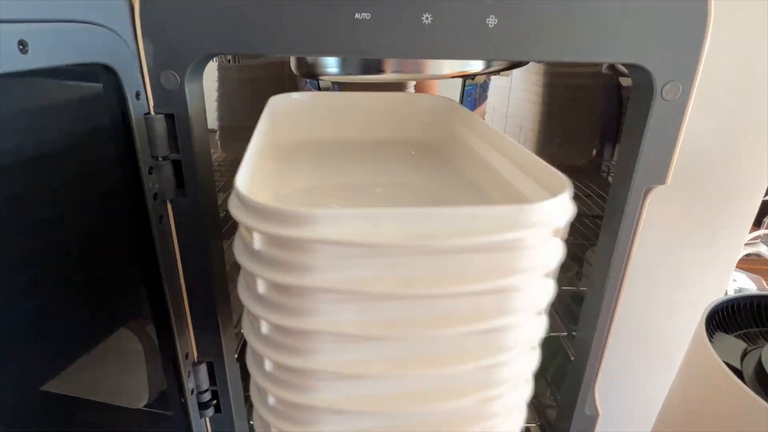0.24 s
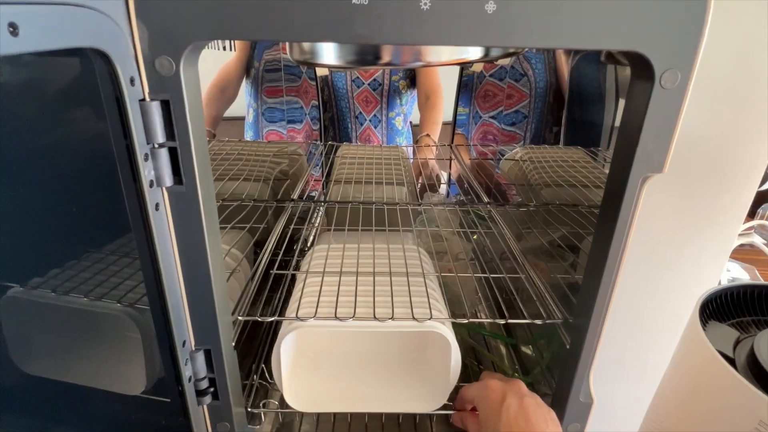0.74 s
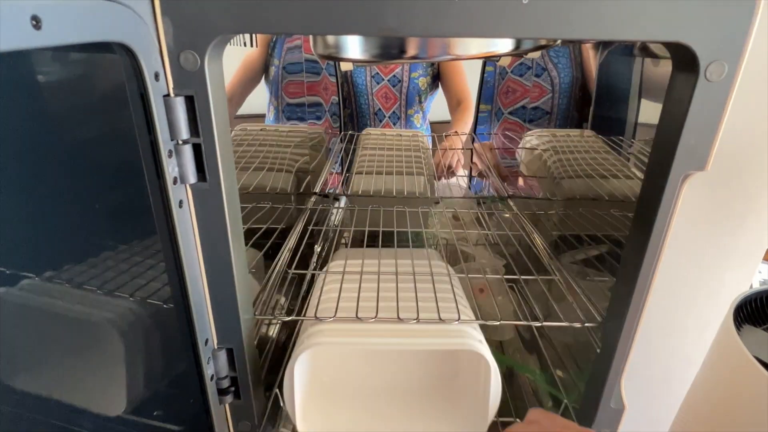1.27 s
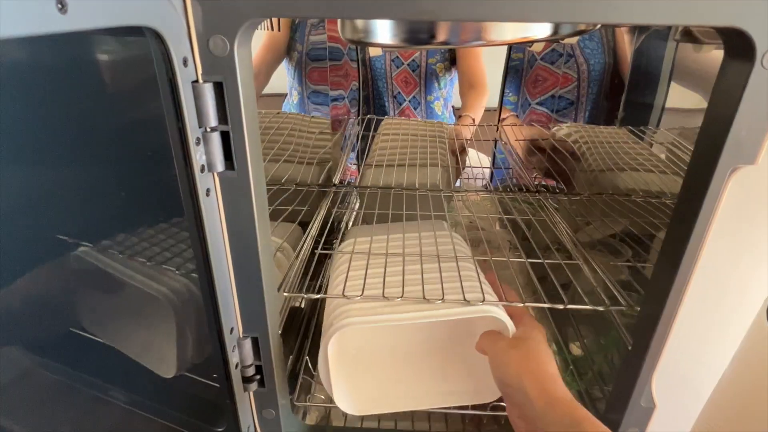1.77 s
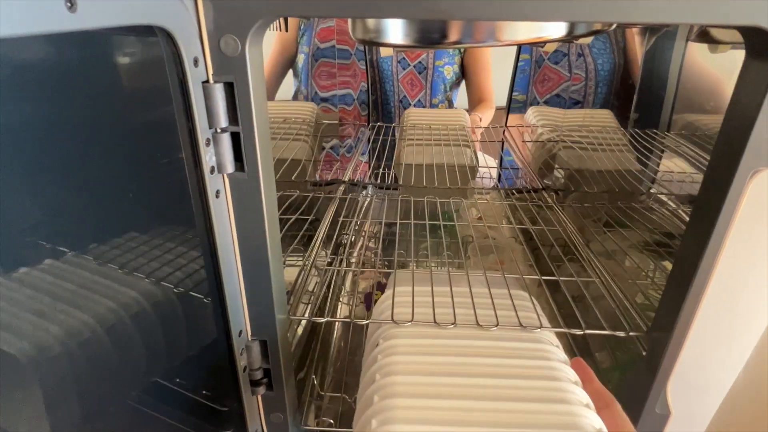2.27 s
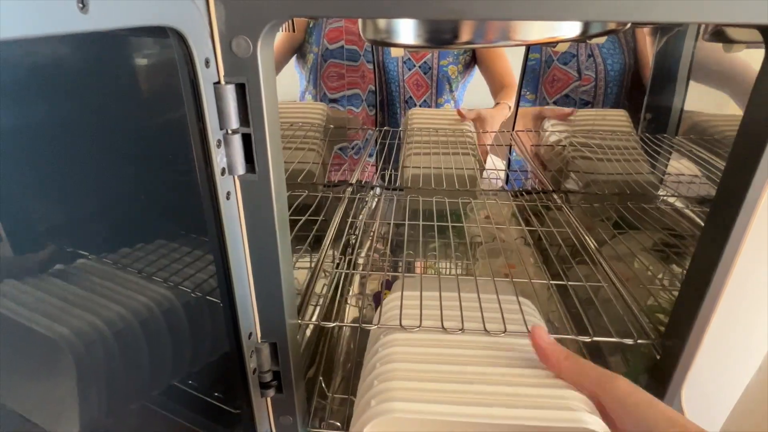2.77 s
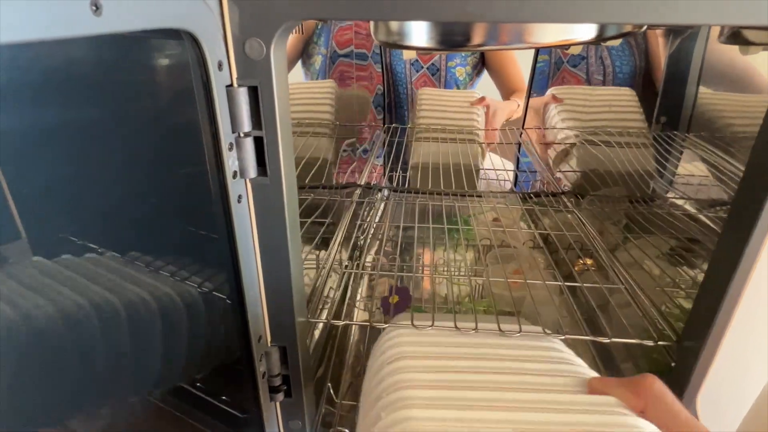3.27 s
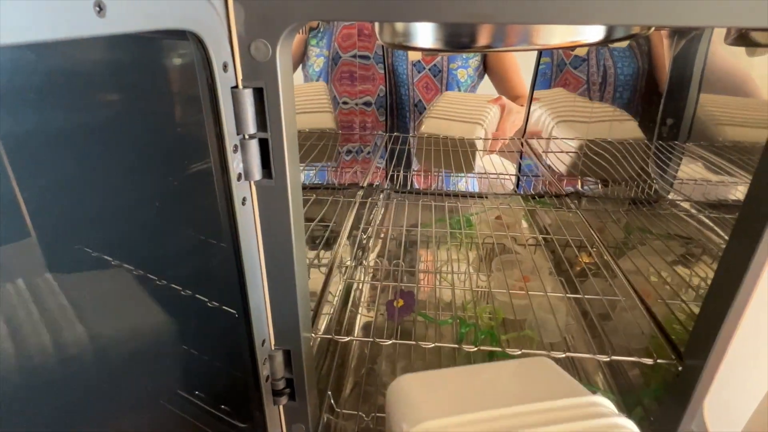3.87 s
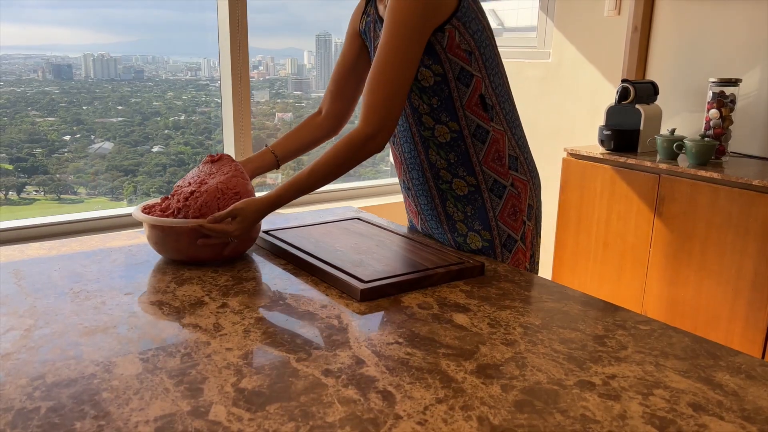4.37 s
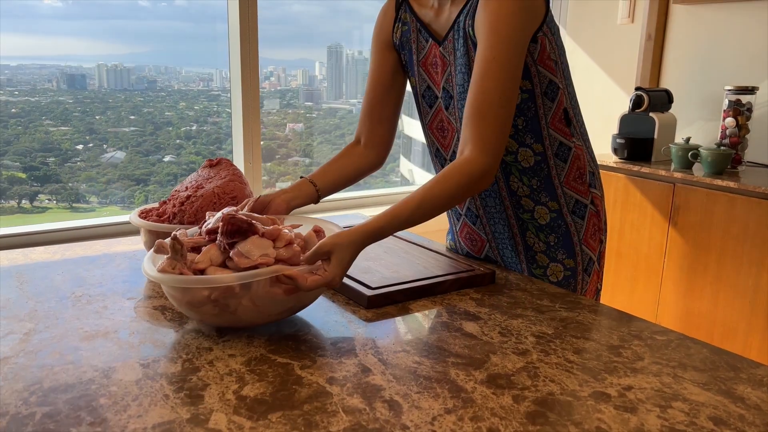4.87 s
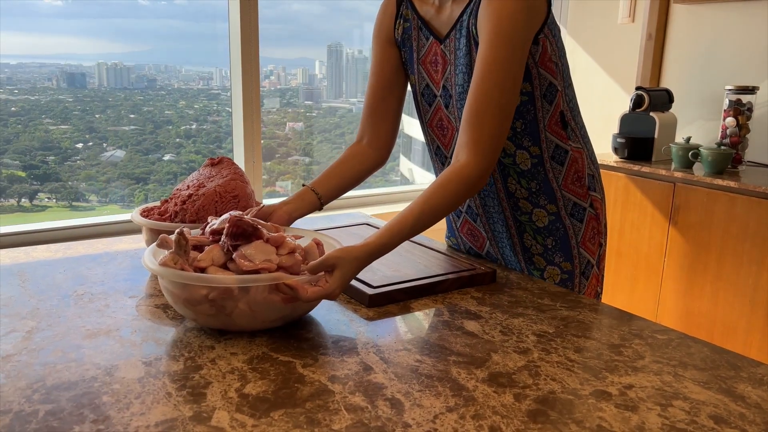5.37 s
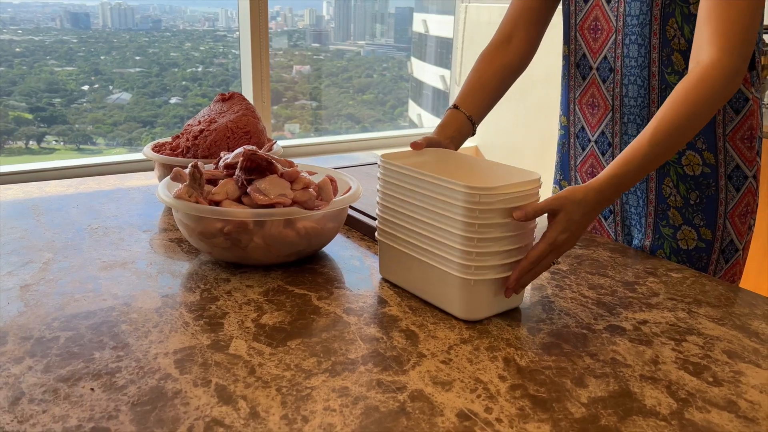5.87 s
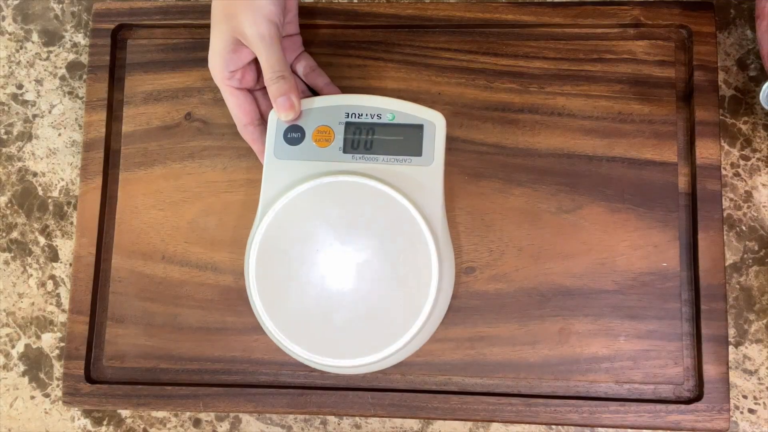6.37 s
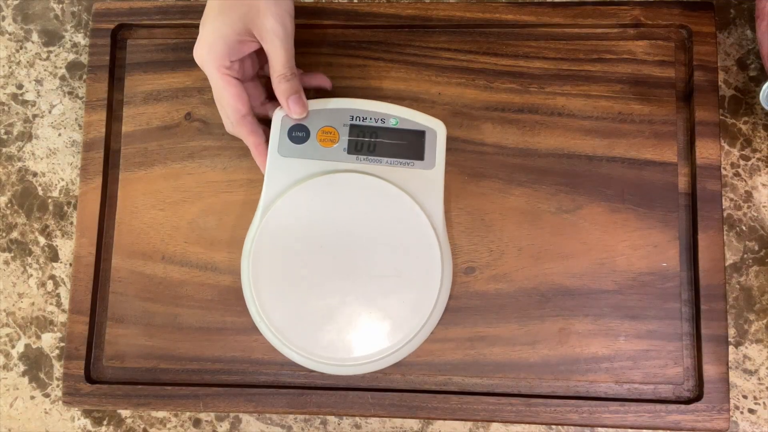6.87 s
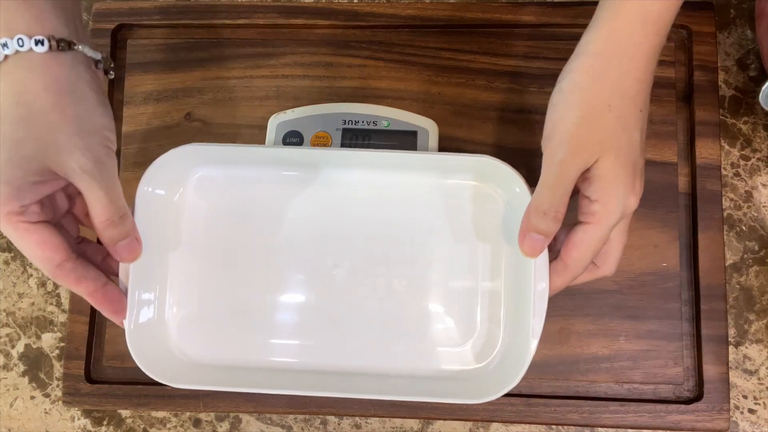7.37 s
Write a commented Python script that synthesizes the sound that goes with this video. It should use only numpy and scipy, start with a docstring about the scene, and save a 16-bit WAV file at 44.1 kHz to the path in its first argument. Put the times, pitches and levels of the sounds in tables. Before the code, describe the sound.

A stack of plastic tubs scrapes in jerks over a wire rack, bowls and stack knock onto stone, then a scale button clicks and a tub lands.

```python
"""A nested stack of plastic tubs is dragged in jerks over the wire rack of a small steel cabinet: stick-slip
noise through the rack's resonances, with knocks and squeaks of the rims and the ring of the steel box.
Then, in a kitchen with a low steady hum, two full bowls and the stack are set on a stone counter a few
steps off; each blow is a set of dying modes plus a noise snap. Last, close to the microphones, the button
of a kitchen scale is pressed, the scale is nudged, and an empty tub lands on it."""
import sys
import numpy as np
from scipy import signal
from scipy.fft import rfft, irfft, next_fast_len
from scipy.io import wavfile
from scipy.ndimage import uniform_filter1d

SR = 44100
rng = np.random.default_rng(int(sys.argv[2]) if len(sys.argv) > 2 else 0)


def master_out(mix):
    """Clip the mix to full scale and print it as 16-bit PCM to the path in sys.argv[1]."""
    frames = np.transpose(np.atleast_2d(mix))
    ceiling = np.clip(frames, -1, 1)
    pcm = np.round(ceiling * 32767).astype(np.int16)
    wavfile.write(sys.argv[1], SR, pcm)


N = 336924
TIME = np.arange(N) / SR  # seconds

# Background air at the cabinet, the counter and the board. Each row: frequency in Hz, relative dB per Hz.
CABINET_AIR = [(20, -21.5), (55, 2), (80, -2.5), (130, -0.5), (270, -6.5), (700, -13.5), (1400, -21),
               (3000, -32.5), (6000, -44), (13000, -44), (15000, -60.5)]
COUNTER_AIR = [(20, -42), (36, -16.5), (55, -5), (100, -9), (160, -13), (300, -20.5), (470, -25),
               (620, -24), (760, -29.5), (1400, -31), (3000, -48), (4200, -54), (13000, -65.5),
               (14500, -80)]
BOARD_AIR = [(20, -32), (50, -9.5), (100, -4), (160, -13.5), (250, -12), (400, -20.5), (650, -25.5),
             (1200, -34), (2000, -41.5), (4000, -52.5), (8000, -55), (11000, -73), (14500, -49)]
CABINET_AIR_DB, COUNTER_AIR_DB, BOARD_AIR_DB = -56, -41, -43
# Hum of the ventilation. Each row: frequency in Hz, width in Hz, rise in dB.
HUM_PEAKS = [(58.8, 9.8, 9), (89.1, 8, 9)]

# How long the kitchen rings. Each row: frequency in Hz, decay by 60 dB in seconds.
ROOM_T60 = [(100, .5), (400, 0.4), (1200, 0.51), (3000, 0.57), (6000, 0.56), (9000, 0.3), (16000, 0.72)]
# Tone of the kitchen's tail. Each row: frequency in Hz, level in dB.
ROOM_TONE = [(100, 0), (400, 1.5), (1200, -1), (4000, 1), (8500, 0), (12500, 2.5), (15000, -6.5)]
# The steel box dies fast, but its wires ring on in narrow ranges. Each row: frequency in Hz, 60 dB decay in s.
BOX_T60 = [(170, 0.38), (700, 0.18), (930, .5), (1320, 0.2), (1490, 0.5), (1700, 0.15), (3900, 0.22),
           (4230, 0.65), (4500, 0.23), (12000, 0.11)]
# Tone of the steel box. Each row: frequency in Hz, level in dB.
BOX_TONE = [(150, 0.5), (1300, -1.5), (1490, 6), (1750, -2), (4250, -2.5), (8000, -4.5)]

# Likeness of a diffuse field at the two microphones. Each row: frequency in Hz, correlation from 0 to 1.
LIKENESS = [(60, 0.96), (300, 0.83), (640, 0.594), (1400, 0.015), (3000, 0.0039), (6000, 0.045),
            (9000, 0.0094), (16000, 0.056)]
# The two microphones differ in the treble. Each row: frequency in Hz, left minus right in dB.
MIC_DIFFERENCE = [(400, -0.5), (1000, -0.1), (2200, -0.1), (3600, -1), (6000, -2), (8500, 2.5), (11000, 2),
                  (13000, 1.2)]
# The level dips briefly. Each row: time in seconds, gain in dB.
DIPS = [(.643, -1), (.648, -29), (.69, -10), (.75, 0), (1.675, 1), (1.68, -29.5), (1.705, 0)]
EDGE_HZ = 16200  # upper band limit

# Blows. Each row: start in seconds, thud level in dB, snap level in dB.
BOWL_HITS = [(4.339, -17, -15), (4.377, -24, -12.5), (4.412, -29, -27), (4.436, -30, -21.5),
             (4.967, -27, -23), (5.0745, -20.5, -13.5), (5.091, -34, -30.5)]  # a bowl meets the counter
THUMPS = [(4.36, -32.5, -61), (5.078, -28, -59.5), (5.105, -29, -60)]  # the weight of a full bowl thumps the slab
STACK_HITS = [(5.658, -40, -35), (5.668, -27.5, -10.5), (5.686, -23.5, -8.5)]  # the stack meets the counter
PRESSES = [(6.2213, -5.5, -21), (6.453, -9.5, -45), (6.487, -30, -60)]  # the button clicks down and up
NUDGES = [(6.641, -41, -40.5), (6.665, -20, -41), (6.748, -19.5, -16.5), (6.801, -27, -49.5),
          (6.896, -20.5, -48)]  # the feet of the scale knock on the board
LANDINGS = [(7.138, -31, -37), (7.146, -26.5, -20), (7.1492, -3, -14), (7.186, -13, -16), (7.21, -27, -22)]  # the empty tub lands and rocks
CATCHES = [(0.082, -44, -28), (0.097, -27.5, -50.5), (0.153, -40, -37.5), (0.294, -31.5, -30.5),
           (0.336, -21.5, -24.0), (0.948, -22, -54.5), (1.034, -25.5, -45), (1.179, -33.5, -20),
           (1.251, -28, -18.5), (1.277, -21.5, -17), (1.491, -36, -30), (1.864, -21.5, -17),
           (1.953, -18, -26.5), (1.986, -18, -13.5), (2.065, -29, -18), (2.097, -14.5, -26.0),
           (2.431, -29.0, -20), (2.511, -28.5, -7), (2.533, -25.5, -11), (2.868, -35.5, -21),
           (2.981, -20.0, -32.0), (3.064, -21, -50.0), (3.079, -32.0, -27), (3.124, -31.5, -24),
           (3.139, -21.5, -20), (3.178, -20.5, -17.5), (3.3, -21, -32.5), (3.548, -24, -12.5),
           (3.613, -20.0, -12)]  # a rim catches on a wire

# Modes of each struck thing. Each row: frequency in Hz, relative level in dB, decay by 60 dB in seconds.
BOWL_MODES = [(215.4, -14, 0.14), (457, -1.5, 0.045), (521, -0.5, 0.056), (630, -8.5, 0.043),
              (900, -4.5, 0.047), (1350, -7.5, 0.044), (1578, -7.5, 0.037), (2860, -12, 0.034)]
SLAB_MODES = [(103.6, -5.5, 0.303), (151.4, 0.5, 0.222), (206, -3, 0.115), (303, -5.5, 0.147)]
STACK_BASE_MODES = [(186.5, -12, 0.147), (224, 0.5, 0.1), (273, -1, 0.094), (349, -4, .08),
                    (485, -4, 0.065), (609.2, -6.5, 0.078)]  # the stack standing on stone
SCALE_MODES = [(336, -13.5, 0.18), (501, -15.5, 0.2), (592, -2, 0.068), (667, -18, 0.14),
               (1128, -12.5, 0.119), (1266, -6.5, 0.033), (1347, 5, 0.01335), (1600, -12.5, 0.029),
               (1986, -13.5, 0.0079), (2496, -26, 0.022)]
FEET_MODES = [(307.7, -18.5, 0.15), (620, -13.5, 0.07), (1083, -9, 0.042), (1182, -1.5, 0.027),
              (1330, -6.5, 0.038), (1762, -8.5, 0.016), (2416, -19, 0.01)]
TUB_MODES = [(326.2, -11.5, 0.22), (444.5, -19, 0.112), (540, -6.5, 0.077), (613, 3, 0.0245),
             (732, -11, 0.011), (1064, -16, 0.072), (1334, -10.5, 0.045), (1450, -1.5, 0.027),
             (2133, -22, 0.019), (2540, -30, 0.083)]
STACK_MODES = [(166, -4, .17), (201.8, 0.5, .12), (261.2, 0, .1), (335, -2, 0.085), (406, -3, .1),
               (532, -0.5, 0.058), (997, -15, 0.04)]  # the stack on the rack

# Colour of the snap of each contact. Each row: frequency in Hz, relative dB per Hz.
BOWL_SNAP = [(150, -7), (500, -2), (1100, 4), (2800, -3), (4200, -16.5), (7000, -18), (10000, -35),
             (12000, -26), (16000, -40)]
STACK_SNAP = [(150, -11), (500, -2), (1200, 0), (2000, -1), (3000, -3), (4200, -4), (6200, -1),
              (8500, -11.5), (10000, -21), (12000, -16), (16000, -31)]  # the stack on stone
BUTTON_SNAP = [(200, -20.5), (650, 5), (1500, -1), (2500, 4.5), (4000, -3.5), (6200, -10.5), (8800, -14),
               (10500, -35), (14200, -22.5), (16000, -20.5)]
PLASTIC_SNAP = [(200, -12), (650, 8), (1400, 6), (3000, 0), (6000, -4.5), (8800, -3), (9900, -29),
                (12300, -29), (14200, -1), (16000, -10)]
RIM_SNAP = [(150, -21), (500, 4), (1300, 3.5), (2400, 3.5), (3500, -1), (6000, -8), (8500, -21),
            (9900, -29), (12000, -11.5), (16000, -27)]  # a rim on a wire

# A bowl brushes the counter. Each row: start in seconds, length in seconds, relative level in dB.
BOWL_BRUSHES = [(4.0, 0.14, -58.5), (4.315, .09, -48), (4.44, 0.074, -45.5), (5.015, .03, -46)]
# Fingers, then the tub, brush the plastic of the scale. Each row: start in s, length in s, level in dB.
SCALE_BRUSHES = [(6.655, .15, -52.5), (6.88, 0.035, -51), (7.06, .06, -49), (7.145, 0.12, -46.5)]
BRUSH_ATTACK_S, BRUSH_SWELL_DB, BRUSH_FALL_DB_PER_S = 0.02, -4, 220  # each brush eases off as it goes

# Colour of the sliding contact. Each row: frequency in Hz, relative dB per Hz.
SLIDE_COLOUR = [(35, -46), (100, -14), (180, 2), (560, -0.5), (730, -8), (1200, -8), (1900, -12.5),
                (6000, -14), (7000, -15.5), (7600, -23.5), (8400, -16), (9500, -23), (9950, -41),
                (10900, -18.5), (12400, -18), (13400, -24.5), (14300, -45)]
# Resonances of stack, rack and cabinet. Each row: frequency in Hz, width in Hz, rise in dB.
RACK_PEAKS = [(170.3, 19, 6.5), (230, 45, 1.5), (325, 18, -0.5), (390, 65, 5.5), (517.7, 54, 2.5),
              (1000, 120, 7.5), (1197, 31, 0.5), (1399, 54, 5.5), (1580, 45, 4.5), (2139.5, 67, 6.5),
              (2460, 22, 5.5), (3200, 120, 2.5), (4607, 35, 7), (4770, 34, 6.5), (4970, 27, 4.5),
              (5712, 140, 4), (6740, 60, 3), (12100, 61, 5.5)]
# Squeaks of plastic on wire, and one faint ring of a wire (1490 Hz).
# Each row: start in seconds, length in seconds, pitch in Hz, level in dB.
SQUEAKS = [(0.224, 0.0484, 2090, -43), (0.837, 0.035, 624, -27.5), (1.7, 0.042, 4670, -51),
           (1.97, 0.109, 169.6, -21), (2.503, 0.057, 2330, -25.5), (2.503, 0.056, 2647, -26),
           (2.511, 0.05, 865, -24.5), (2.432, 0.04, 880, -29), (3.39, .13, 1490, -42.5),
           (3.87, 0.063, 2396, -53), (3.86, 0.067, 4710, -51)]
# The stack slides a little way. Each row: start in seconds, length in seconds, force in dB,
# scrape in dB (how much the rims scrape rather than judder).
SHOVES = [(0.0, 0.18, -55.5, -4), (0.201, 0.053, -39, -8.5), (0.273, 0.016, -47.5, -9.5),
          (0.33, 0.012, -38, -28), (0.747, 0.011, -39.5, -41), (0.77, 0.028, -38, -7.0),
          (0.815, 0.021, -30, -16.5), (0.859, 0.079, -27.5, -13), (0.983, 0.018, -38.5, -18.5),
          (1.024, 0.028, -37, -8.5), (1.101, 0.04, -27.5, -11), (1.16, 0.055, -32.5, -12),
          (1.256, 0.054, -24, -0.5), (1.302, 0.1, -21.5, 0.5), (1.431, 0.077, -35, -2),
          (1.54, 0.06, -45.5, -25), (1.692, 0.03, -37.5, -30), (1.786, 0.03, -41.0, -14),
          (1.818, 0.018, -35.0, -8.5), (1.906, 0.046, -24.5, -5.5), (1.972, 0.059, -25.0, -7.0),
          (2.056, 0.073, -21.5, -4.5), (2.154, 0.074, -21, -2), (2.236, 0.015, -21.5, -25),
          (2.319, 0.031, -37.5, -15.0), (2.409, 0.013, -33.5, -4), (2.42, 0.017, -27.5, -8),
          (2.493, 0.048, -26.5, -4.5), (2.618, 0.041, -31.0, -4), (2.67, 0.02, -41.5, -13.5),
          (2.827, 0.031, -47, -0.5), (2.871, 0.023, -28.5, -9.5), (2.922, 0.024, -27.5, -28),
          (2.962, 0.037, -29.5, -3), (3.068, 0.013, -40.0, 6), (3.124, 0.017, -25.0, -1),
          (3.175, 0.1, -21.5, 1.5), (3.329, 0.071, -33.5, -10.0), (3.519, 0.068, -26.5, 4.5),
          (3.596, 0.035, -19.0, 0.0), (3.629, 0.073, -31.5, 7), (3.703, 0.048, -27, -2),
          (3.844, 0.06, -44.5, -4)]
SHOVE_ATTACK_S, SHOVE_SWELL_DB = 0.021, 2.5  # the stack breaks loose, then gathers speed until it sticks again
JUDDER_FALL_DB_PER_S, RASP_FALL_DB_PER_S, HISS_FALL_DB_PER_S = 235, 247, 350
RASP_SHARE = 0.45  # the rasp of the rims follows this share of the scrape, the hiss of the wires all of it


def amp(db):
    """Turns dB into an amplitude factor."""
    return 10 ** (np.asarray(db) / 20)


def evened(x):
    """Scales to rms 1."""
    return x / np.sqrt(np.mean(x ** 2) + 1e-20)


def read(points, hz):
    """Reads a spectrum on a log-frequency axis."""
    f, value = np.transpose(points)
    return np.interp(np.log(hz + 1), np.log(f + 1), value)


def curve(rows):
    """Gain over time from (s, dB) points; silent outside them."""
    seconds, db = np.transpose(rows)
    return amp(np.interp(TIME, seconds, db, left=-140, right=-140))


def add(mix, s, sound):
    """Mixes a stereo sound in at time s."""
    part = mix[:, round(s * SR):][:, :sound.shape[1]]
    part += sound[:, :part.shape[1]]


def panned(x, left_db):
    """Leans a sound to the left (positive dB) or right by level alone."""
    return x * amp([[left_db / 2], [-left_db / 2]])


def split(x, hz):
    """The parts below and above a frequency."""
    low = signal.sosfiltfilt(signal.butter(3, hz, fs=SR, output="sos"), x)
    return low, x - low


def colour(x, spectrum, peaks=()):
    """Filters by a broad spectrum with resonances on top."""
    size = next_fast_len(x.shape[-1], True)
    hz = np.fft.rfftfreq(size, 1 / SR)
    db = read(spectrum, hz)
    for f, width, rise in peaks:
        db = db + rise / (1 + (2 * (hz - f) / width) ** 2)
    return irfft(rfft(x, size) * amp(db), size)[..., :x.shape[-1]]


def paired(x):
    """Two unrelated signals become a diffuse field at two close microphones: alike mainly in the bass."""
    size = next_fast_len(x.shape[1], True)
    left, other = rfft(x, size)
    same = read(LIKENESS, np.fft.rfftfreq(size, 1 / SR))
    right = same * left + np.sqrt(1 - same ** 2) * other
    return irfft(np.array([left, right]), size)[:, :x.shape[1]]


def diffuse_noise(length):
    """White noise arriving from all around at the two microphones."""
    return paired(rng.standard_normal((2, length)))


def reverb(x, t60s, tone):
    """A diffuse tail, each band dying at its own speed."""
    hz, t, z = signal.stft(diffuse_noise(SR), SR, nperseg=256)
    decay_db = read(tone, hz)[:, None] - 60 * t / read(t60s, hz)[:, None]
    tail = signal.istft(z * amp(decay_db), SR, nperseg=256)[1]
    tail *= 1 - np.exp(-(np.arange(tail.shape[1]) / SR / 0.0035) ** 2)  # builds up over some milliseconds
    tail /= np.linalg.norm(tail[0])
    return signal.fftconvolve(x.mean(0)[None], tail, axes=1)[:, :N]


def strokes(rows, attack_s, swell_db, fall_db_per_s):
    """Gain over time of sliding strokes (s, length s, dB): each rises, swells or eases, and dies away."""
    clock = TIME[::32]  # a coarse clock is enough for a gain
    start, length, db = np.transpose(rows)[:, :, None]
    t = clock - start
    swell = swell_db * (np.clip(t / length, 0, 1) - .5)
    fall = fall_db_per_s * np.maximum(t - length, 0)
    gain = np.clip(t / attack_s, 0, 1) * amp(db + swell - fall)
    return np.interp(TIME, clock, np.linalg.norm(gain, axis=0))  # overlapping strokes add in power


def brushed(rows):
    """Gain of light strokes over a smooth surface."""
    return strokes(rows, BRUSH_ATTACK_S, BRUSH_SWELL_DB, BRUSH_FALL_DB_PER_S)


def blows(hits, modes, snap_spectrum, contact_s, snap_s, rattle_db, rattle_s, detune):
    """Each blow rings the object's modes and gives a sharp snap with a short rattle after it."""
    out = np.zeros((2, N))
    t = np.arange(SR // 2) / SR
    hz, db, t60 = np.transpose(modes)[:, :, None]
    for s, thud_db, snap_db in hits:
        pitch = hz * (1 + detune * rng.standard_normal(hz.shape))  # each blow's modes vary slightly at random
        ring = (amp(db - 60 * t / t60) * np.sin(2 * np.pi * pitch * t)).sum(0)
        ring *= 1 - np.exp(-(t / contact_s) ** 2)  # a softer contact starts slower
        shape = amp(-60 * t / snap_s) + amp(rattle_db - 60 * t / rattle_s)
        snap = colour(diffuse_noise(len(t)), snap_spectrum) * shape
        snap *= np.linalg.norm(shape) / np.linalg.norm(snap) / np.sqrt(2)  # even strength from draw to draw
        thud = ring / abs(ring).max()
        add(out, s, amp(thud_db) * thud + amp(snap_db) * snap)
    return out


def air(spectrum, db, start_s, end_s, waver_db):
    """Ventilation: a low wavering hum under a faint rush, made of filtered noise."""
    rush = evened(colour(diffuse_noise(N), spectrum, HUM_PEAKS))
    waver = evened(sum(np.sin(2 * np.pi * (f * TIME + rng.random())) for f in np.geomspace(.5, 8, 12)))
    present = 1. * ((TIME >= start_s) & (TIME < end_s))
    return rush * amp(db + waver_db * waver) * uniform_filter1d(present, size=400)


def counter():
    """Bowls and the stack set down on stone, a few steps off, so the kitchen answers strongly."""
    bowls = blows(BOWL_HITS, BOWL_MODES, BOWL_SNAP, contact_s=0.0011, snap_s=0.019,
                  rattle_db=-20.5, rattle_s=0.11, detune=0.046)
    bowls += colour(diffuse_noise(N), BOWL_SNAP) * amp(10) * brushed(BOWL_BRUSHES)
    slab = blows(THUMPS, SLAB_MODES, BOWL_SNAP, contact_s=0.005, snap_s=.02,
                 rattle_db=-20, rattle_s=.1, detune=0.041)
    stack = blows(STACK_HITS, STACK_BASE_MODES, STACK_SNAP, contact_s=0.0043, snap_s=0.0188,
                  rattle_db=-18.0, rattle_s=0.11, detune=0.023)
    room = reverb(bowls + amp(-3.5) * stack, ROOM_T60, ROOM_TONE)
    return panned(bowls, left_db=-2.5) + slab + panned(stack, left_db=-1.5) + room


def dispersed(x, lag_s, knee_hz):
    """Bending waves in thin plastic: the treble arrives first and the bass lags, so each click drops in pitch."""
    size = next_fast_len(N, True)
    hz = np.fft.rfftfreq(size, 1 / SR)
    phase = 2 * np.pi * lag_s * knee_hz * np.arctan(hz / knee_hz)
    return irfft(rfft(x, size) * np.exp(-1j * phase), size)[:, :N]


def scale():
    """Button, feet and tub on the hollow plastic scale, close to the microphones."""
    button = blows(PRESSES, SCALE_MODES, BUTTON_SNAP, contact_s=0.00042, snap_s=0.0076,
                   rattle_db=-16.0, rattle_s=0.24, detune=.006)
    feet = blows(NUDGES, FEET_MODES, PLASTIC_SNAP, contact_s=0.00033, snap_s=0.02,
                 rattle_db=-18.5, rattle_s=0.134, detune=0.031)
    tub = blows(LANDINGS, TUB_MODES, PLASTIC_SNAP, contact_s=0.001, snap_s=0.04,
                rattle_db=-12.5, rattle_s=0.106, detune=0.01)
    brushes = evened(colour(diffuse_noise(N), PLASTIC_SNAP)) * brushed(SCALE_BRUSHES)
    knocks = panned(button, left_db=-5.5) + panned(feet, left_db=-4) + panned(tub, left_db=-3.5)
    near = dispersed(knocks, lag_s=0.00701, knee_hz=518.0) + brushes
    ending = curve([(6, -0.5), (7.272, 0), (7.282, -16), (7.6, -60.5)])  # the ring stops short
    return (near + amp(-11) * reverb(near, ROOM_T60, ROOM_TONE)) * ending


def squeaks(waver, sag):
    """Squeaks of plastic on wire and one faint wire ring: rough tones that swell, fade and sag in pitch."""
    out = np.zeros((2, N))
    for s, length, hz, db in SQUEAKS:
        progress = np.linspace(0, 1, int(length * SR))
        jitter = evened(uniform_filter1d(rng.standard_normal(len(progress)), size=120))
        pitch = hz * (1 + waver * jitter - sag * (progress - .5))
        tone = np.sin(2 * np.pi * np.cumsum(pitch) / SR)
        add(out, s, panned(amp(db) * np.sin(np.pi * progress) * tone, left_db=-2))
    return out


def shifting(x, patchy_db):
    """The contact points move from wire to wire, so narrow resonances come and go."""
    z = signal.stft(x, SR, nperseg=1024, noverlap=768)[2]
    field = rng.standard_normal(z.shape[1:])  # frequency by time
    narrow = evened(uniform_filter1d(uniform_filter1d(field, size=3, axis=0), size=14, axis=1))
    broad = evened(uniform_filter1d(uniform_filter1d(field, size=12, axis=0), size=9, axis=1))
    patches = amp(patchy_db * (narrow + .7 * broad))
    return signal.istft(z * patches, SR, nperseg=1024, noverlap=768)[1][:, :N]


def slips(grit, per_s, spread_db, ring_s, lo_hz, hi_hz, steady_s):
    """Random stick-slip jolts, each leaving a short rattle in one range of the rack's resonances."""
    jolts = (rng.random(N) < per_s / SR) * amp(spread_db * np.minimum(rng.exponential(1, N), 3))
    decay = np.exp(-np.log(1e6) / (ring_s * SR))  # power falls 60 dB in ring_s
    power = signal.lfilter([1], [1, -decay], jolts ** 2)
    x = colour(grit * np.sqrt(power + 0.044 * power.mean()), SLIDE_COLOUR, RACK_PEAKS)
    x = signal.sosfilt(signal.butter(3, [lo_hz, hi_hz], "band", fs=SR, output="sos"), x)
    # the jolts are evened over a short window, so the shoves set the loudness
    mean_power = abs(uniform_filter1d((x ** 2).mean(0), int(steady_s * SR) + 1))
    return x / np.sqrt(mean_power + 1e-12)


def shoved(scrape_share, fall_db_per_s):
    """Gain of one layer of the dragging: the force of each shove plus a share of its scrape."""
    rows = [(s, length, force_db + scrape_share * scrape_db) for s, length, force_db, scrape_db in SHOVES]
    return strokes(rows, SHOVE_ATTACK_S, SHOVE_SWELL_DB, fall_db_per_s)


def dragging():
    """The stack judders over the wires, its rims rasp, and fine slips hiss."""
    grit = shifting(diffuse_noise(N), patchy_db=2.0)
    low = slips(grit, per_s=110, spread_db=3, ring_s=0.048, lo_hz=50, hi_hz=700, steady_s=.03)
    rasp = slips(grit, per_s=360, spread_db=1.0, ring_s=0.082, lo_hz=702, hi_hz=2800, steady_s=.03)
    high = slips(grit, per_s=670, spread_db=3.0, ring_s=0.051, lo_hz=2800, hi_hz=17000, steady_s=0.045)
    boom, judder = split(low, hz=215)
    hiss, fizz = split(high, hz=7450)
    boom_gain = curve([(0, 1), (3.15, 1), (3.55, -4), (4.1, 2)])  # the boom thins towards 3.55 s, then returns
    force = shoved(0, JUDDER_FALL_DB_PER_S)
    rasp_gain = shoved(RASP_SHARE, RASP_FALL_DB_PER_S)
    speed = shoved(1, HISS_FALL_DB_PER_S)
    bite = (speed / amp(-27.5)) ** .28  # fast pulls are brighter
    return (panned(amp(-1.95) * (boom * boom_gain + judder) * force, left_db=-2.0)
            + panned(amp(-0.47) * rasp * rasp_gain, left_db=0.6)
            + panned(amp(-0.3) * (hiss + amp(-0.45) * bite * fizz) * speed, left_db=-1.4))


def cabinet():
    """Dragging, catching and squeaking rims, with the ring of the wires and the steel box."""
    catches = blows(CATCHES, STACK_MODES, RIM_SNAP, contact_s=.003, snap_s=0.032,
                    rattle_db=-21.0, rattle_s=.14, detune=0.043)
    near = dragging() + panned(catches, left_db=-2.5) + squeaks(waver=0.028, sag=0.035)
    ending = curve([(0, 0), (4.0, 0), (4.02, -36)])  # the ring stops short
    return (near + amp(-15.5) * reverb(near, BOX_T60, BOX_TONE)) * ending


def scene():
    """The air of each place in turn, under the counter, the scale and the cabinet."""
    background = (air(CABINET_AIR, CABINET_AIR_DB, start_s=0, end_s=4.005, waver_db=-0.5)
                  + air(COUNTER_AIR, COUNTER_AIR_DB, start_s=4.005, end_s=6.043, waver_db=-1.7)
                  + air(BOARD_AIR, BOARD_AIR_DB, start_s=6.043, end_s=8, waver_db=2.2))
    return background + counter() + scale() + cabinet()


def record(dry):
    """Two slightly unlike microphones, two brief dips in level, then the band limit."""
    left_tone = [(hz, db / 2) for hz, db in MIC_DIFFERENCE]
    right_tone = [(hz, -db / 2) for hz, db in MIC_DIFFERENCE]
    heard = np.array([colour(dry[0], left_tone), colour(dry[1], right_tone)])
    dipped = heard * amp(np.interp(TIME, *np.transpose(DIPS)))
    band_limit = signal.firwin(511, EDGE_HZ, window=("kaiser", 9), fs=SR)
    return signal.oaconvolve(dipped, band_limit[None], "same")


dry = scene()
out = record(dry)
master_out(out)
```